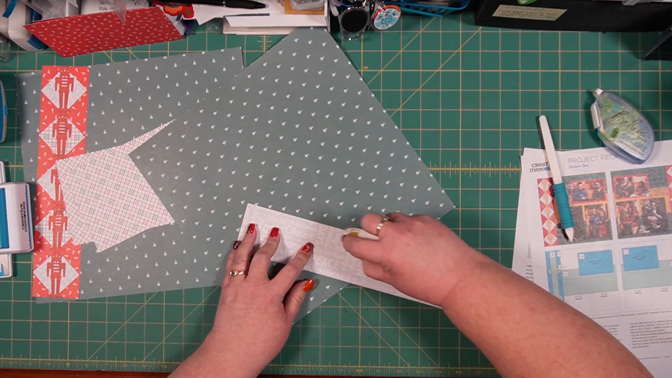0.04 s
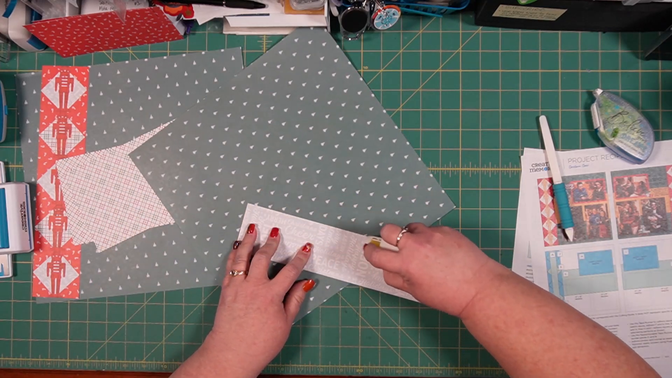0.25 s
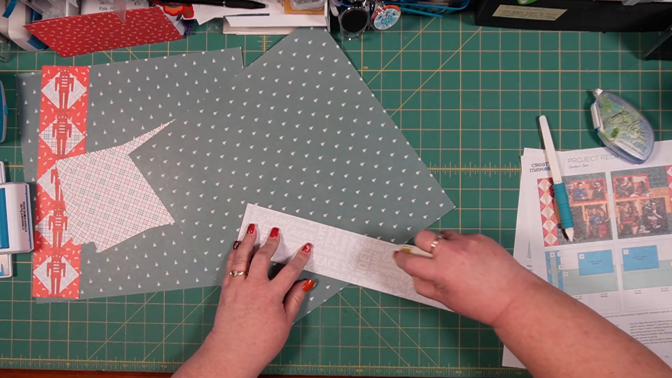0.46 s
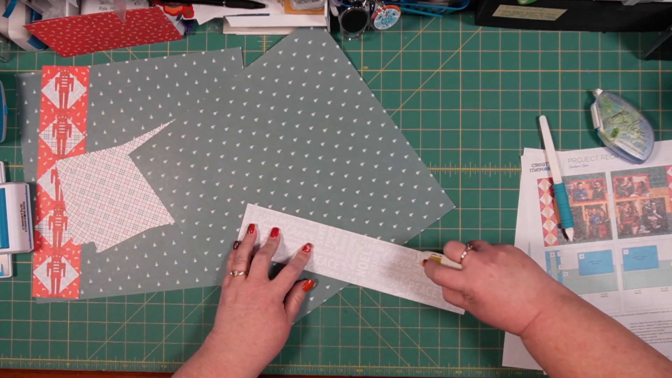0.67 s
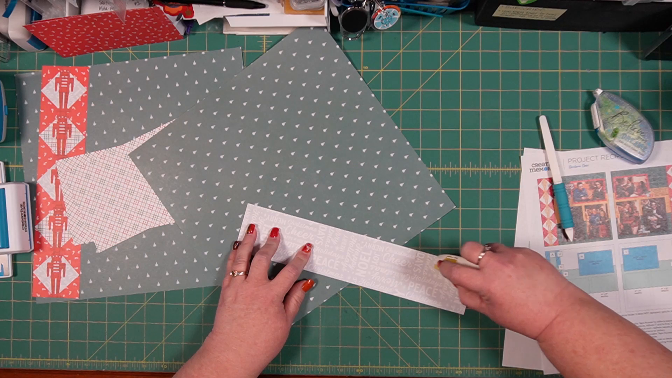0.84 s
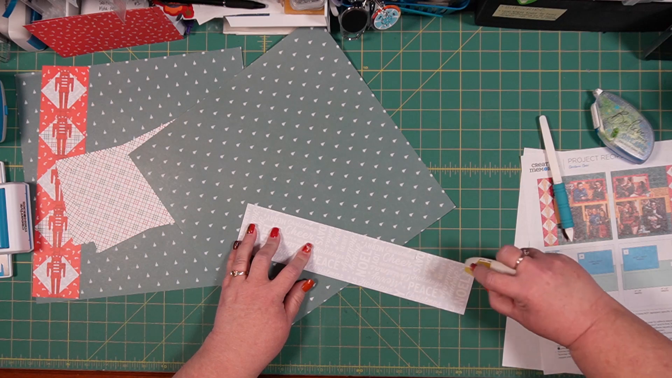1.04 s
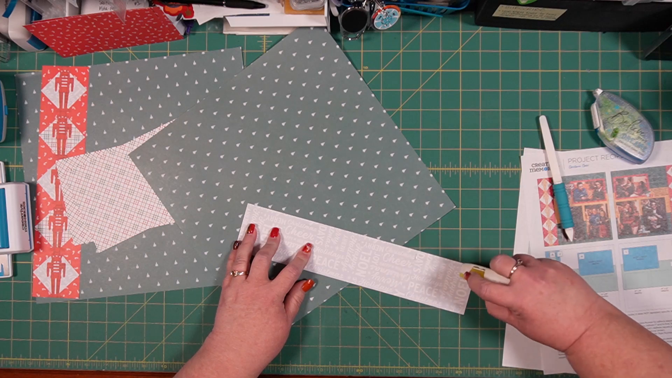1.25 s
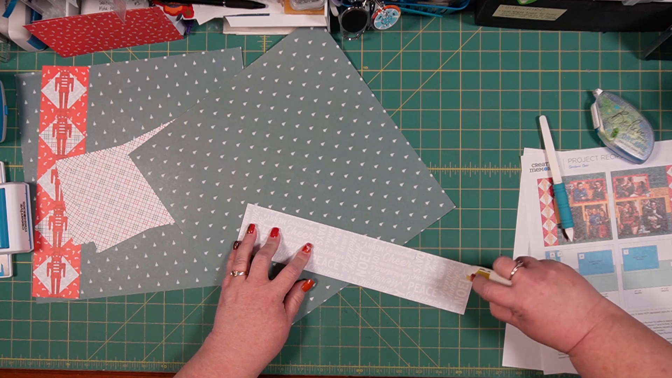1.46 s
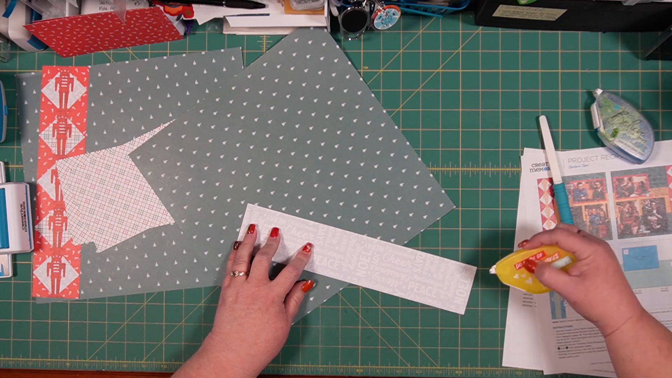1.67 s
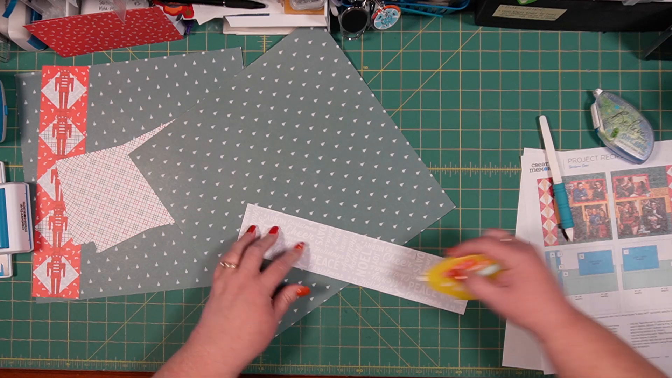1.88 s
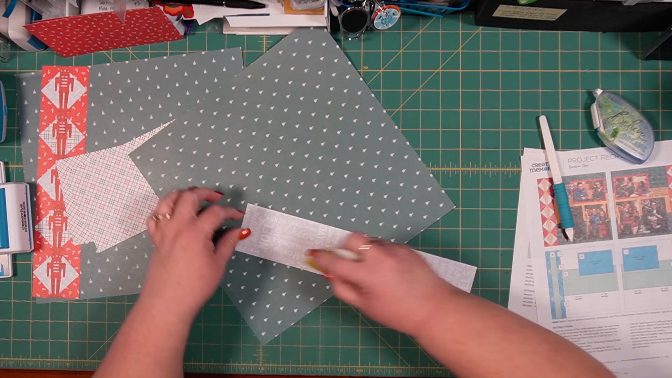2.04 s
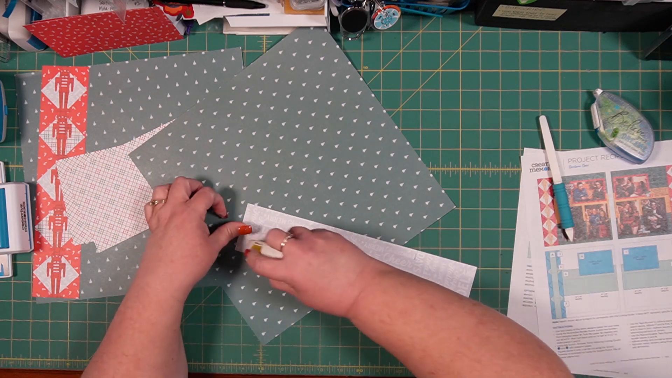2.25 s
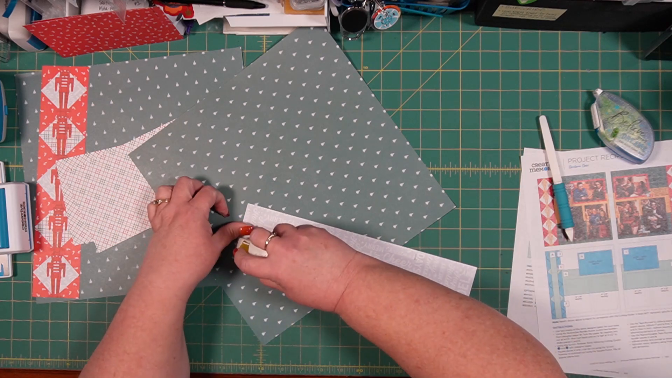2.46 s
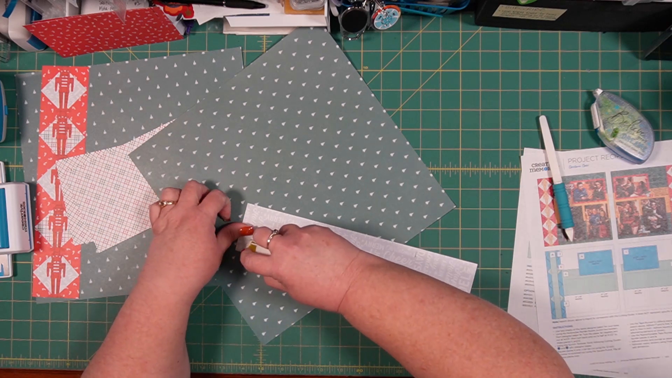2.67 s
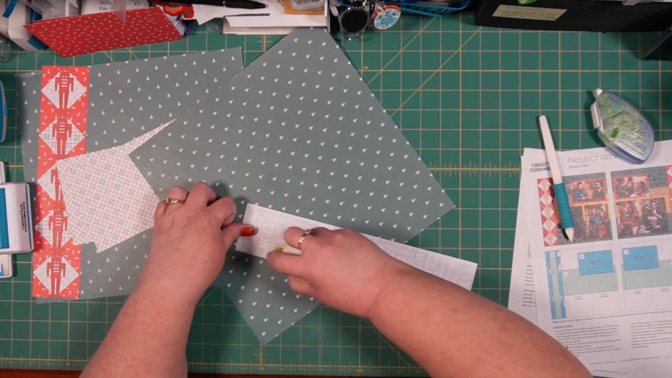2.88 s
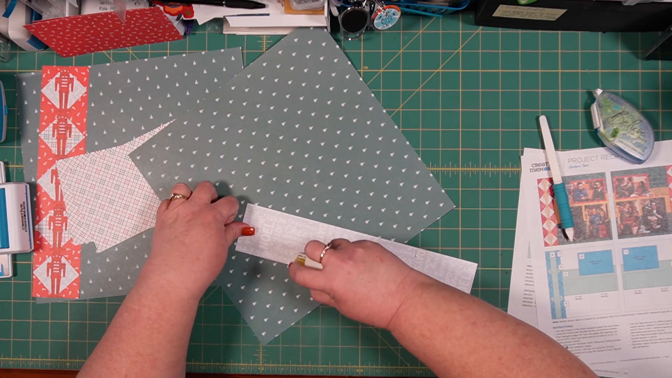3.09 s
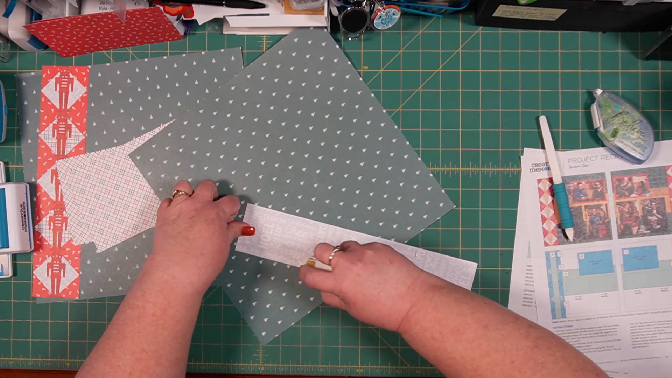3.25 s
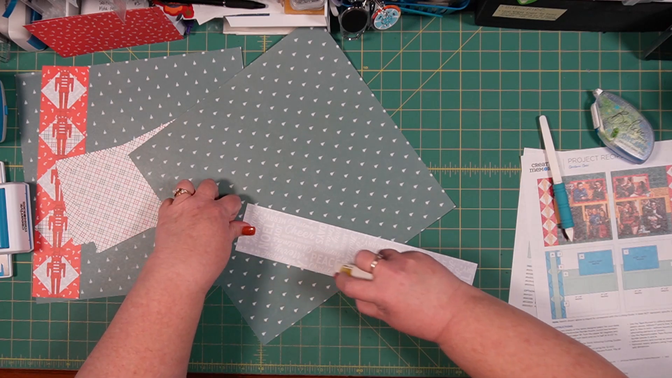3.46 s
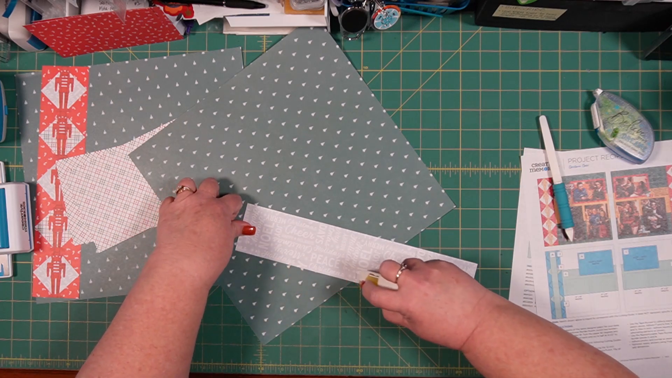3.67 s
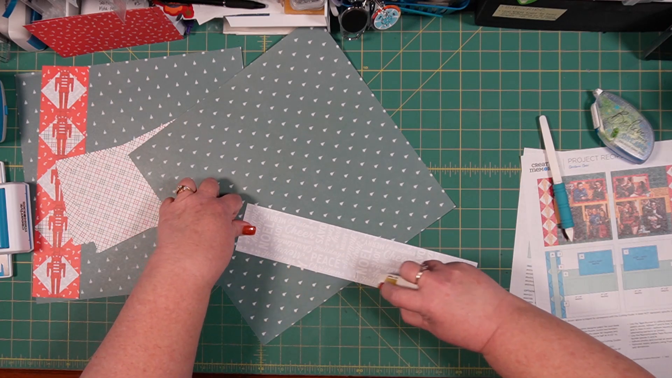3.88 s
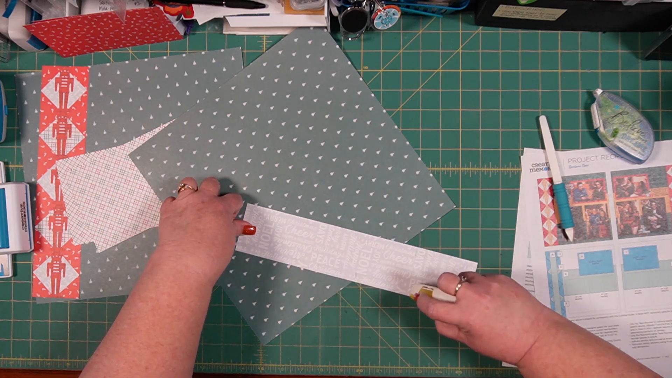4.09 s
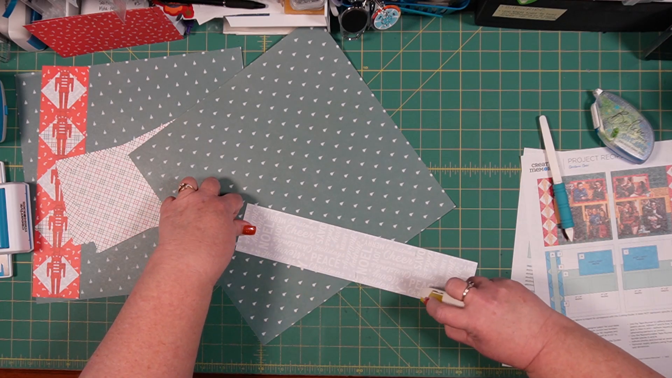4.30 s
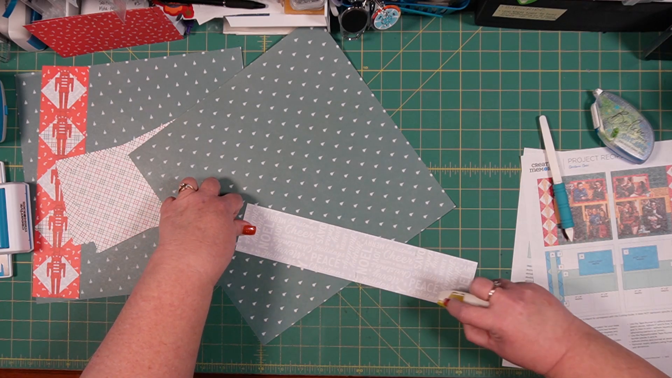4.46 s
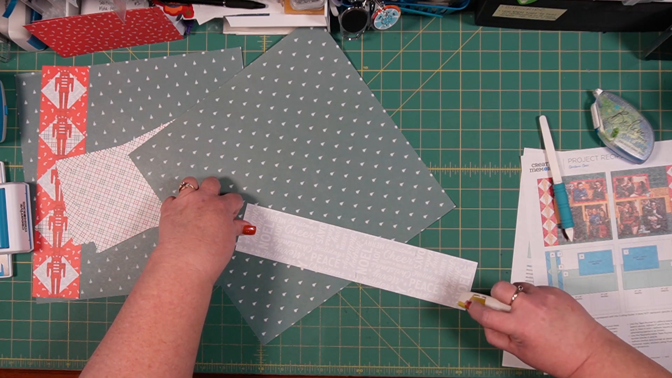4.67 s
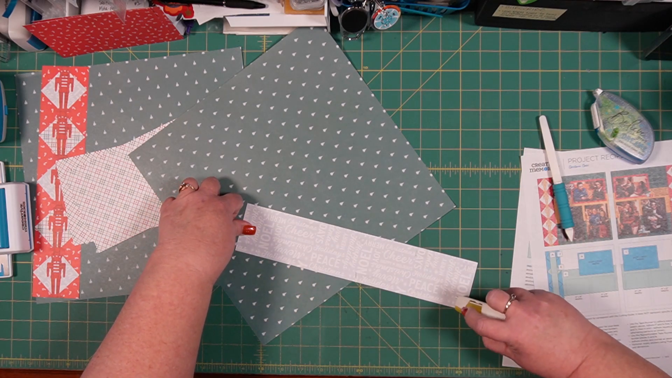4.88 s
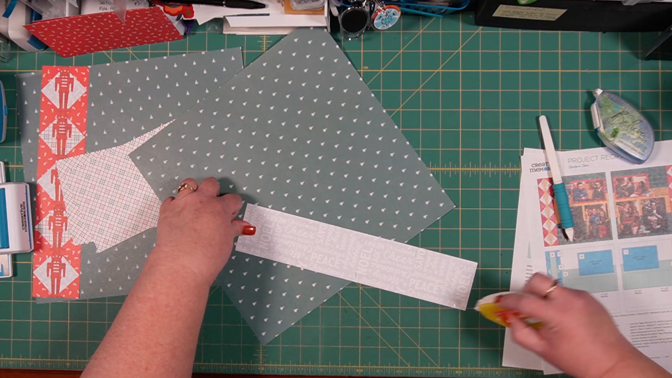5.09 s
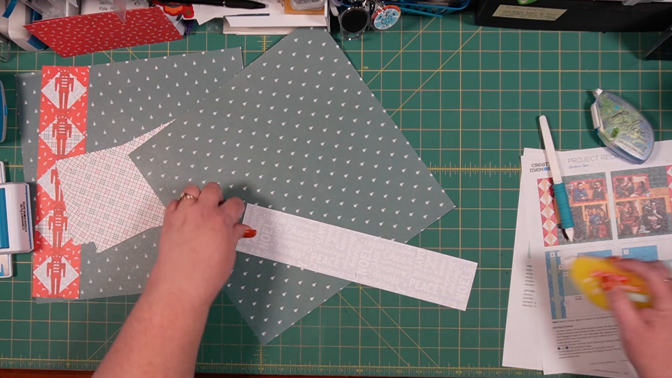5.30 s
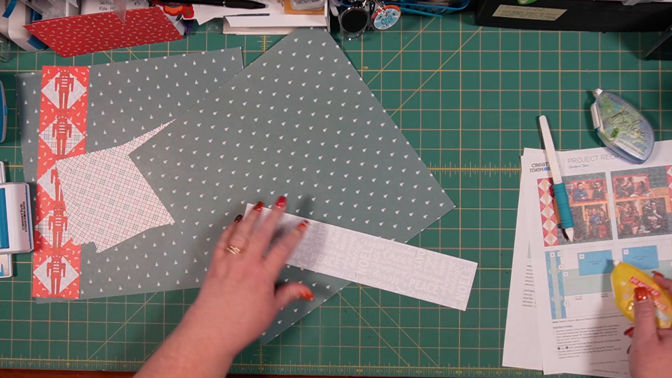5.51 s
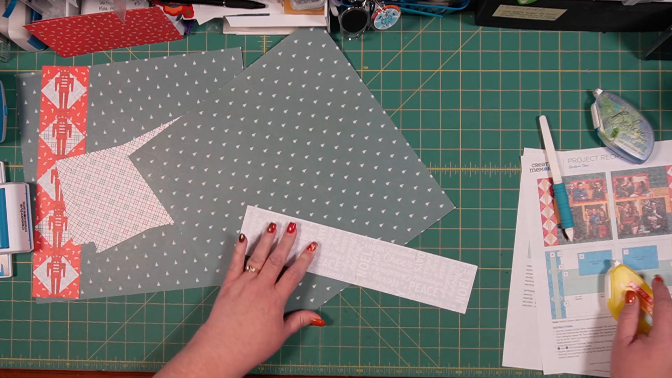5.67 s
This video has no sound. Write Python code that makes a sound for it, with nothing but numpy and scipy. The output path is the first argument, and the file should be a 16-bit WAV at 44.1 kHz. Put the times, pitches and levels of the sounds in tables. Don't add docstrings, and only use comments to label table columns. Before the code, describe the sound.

Eight dry, ratcheting zips of glue film, each under a quarter second, ring a small plastic case over faint table rumble. Between them come fingertip and plastic ticks on paper and faint skin and cloth rubbing. Finally the case knocks down loudly, rocks, and knocks again. Mono, near and mostly dry, short room echo, low hum and faint sinking whine underneath.

```python
import sys
import numpy as np
from scipy import signal
from scipy.fft import rfft, irfft, next_fast_len
from scipy.io import wavfile
from scipy.ndimage import map_coordinates

SR = 44100
rng = np.random.default_rng(int(sys.argv[2]) if len(sys.argv) > 2 else 0)


def int16_out(signal):
    q = np.round(np.clip(np.atleast_2d(signal).T, -1, 1) * 32767)
    wavfile.write(sys.argv[1], SR, q.astype(np.int16))


def ratio(d):
    e = np.asarray(d, float) / 20
    return 10 ** e


N = 253134

# centre_hz, width_hz, level_db
HOLLOW_MODES = [(670, 101, -6), (894, 41, 0.5), (1094, 85, 3), (1343, 210, -1)]
WALL_MODES = [(1858, 130, -1), (2314, 207, 5.5), (2664, 296, 0)]
NOSE_MODES = [(3222, 410, -2.5), (3752, 163, 4.5), (4380, 830, -10.5)]
# start_s, end_s, rumble_db
STROKES = [(0.195, 0.375, -42.5), (0.654, .852, -43), (1.424, 1.558, -45.5), (2.584, 2.833, -44),
           (3.115, 3.35, -46.5), (3.685, 3.87, -43), (4.259, 4.398, -45.5), (4.93, 5.044, -44)]


def unit(x):
    return x / np.sqrt(np.mean(x ** 2) + 1e-20)


def along(points, hz):
    point_hz, value = np.transpose(points)
    return np.interp(np.log(hz + 1), np.log(point_hz + 1), value)


def wobble(knots_per_s):
    knots = rng.standard_normal(int(N * knots_per_s / SR) + 4)
    return map_coordinates(knots, [np.arange(N) * knots_per_s / SR])


def filtered(x, response):
    m = next_fast_len(N + SR // 2)
    return irfft(rfft(x, m) * response(np.fft.rfftfreq(m, 1 / SR)), m)[:N]


def rung(x, modes):
    def shape(f):
        total = 0
        for k, (centre_hz, width_hz, db) in enumerate(modes):
            loss = 1j * f * width_hz
            total = total + (-1) ** k * ratio(db) * loss / (centre_hz * centre_hz - f * f + loss)
        return total

    power = np.mean(abs(shape(np.linspace(1, SR / 2, num=4096))) ** 2)
    return filtered(x, lambda f: shape(f) / np.sqrt(power))


def snaps(s, db):
    return np.bincount(np.round(s * SR).astype(int), ratio(db), N + 1)[:N]


def bursts(s, ms, db, rise_ms, fall_ms, grain_db):
    t_ms = np.arange(SR // 20) * 1000 / SR
    rise = np.clip(t_ms / np.c_[rise_ms + 0 * s], 0, 1)
    fall = np.exp(-np.clip(t_ms - np.c_[ms], 0, None) / fall_ms)
    where = np.round(np.c_[s] * SR).astype(int) + np.arange(len(t_ms))
    burst_power = (ratio(np.c_[db]) * rise * fall) ** 2
    power = np.bincount(where.ravel(), burst_power.ravel(), N + SR)[:N]
    grains = ratio(grain_db * wobble(2500)) * rng.standard_normal(N)
    return np.sqrt(power) * unit(grains)


def during(gains_db, edge_s=0.024):
    t = np.arange(N) / SR
    total = 0
    for (start_s, end_s, _), db in zip(STROKES, gains_db):
        inside = np.clip(np.minimum(t - start_s, end_s - t) / edge_s + 1, 0, 1)
        total = total + ratio(db) * inside
    return total


def peeling():
    # hollow_db, wall_db, nose_db, film_db, spool_db
    grip = [
        (0, 0, 1, -2.5, 0),
        (2.5, 4, 2, -0.5, -1),
        (.5, 1.5, 2.5, 3, -2),
        (-1, 0, -3.5, 1.5, 1),
        (0, 1.5, 1.5, -3.5, 1.5),
        (-.5, 3, 0, 0, -2.5),
        (0.5, 3, 2.5, 0, -7),
        (1, 2.5, 0, 2, 2.5),
    ]
    # centre_hz, width_hz, level_db
    film_modes = [(4810, 510, -0.5), (5690, 510, 3), (7340, 960, -5)]
    fizz_modes = [(9160, 2140, -3), (11900, 2350, -2), (15140, 2850, 0.5)]
    spool_hz = [9900, 10830, 10000, 10100, 9920, 9700, 9900, 10020]

    s, ms, crackle_db, case_db = jerks()
    hollow_db, wall_db, nose_db, film_db, spool_db = np.transpose(grip)
    hold_ms = np.clip(ms - 1.2, 0.3, None)

    crackle = bursts(s, hold_ms, crackle_db, rise_ms=0.5 * ms, fall_ms=0.89, grain_db=0.9)
    fizz = ratio(-0.5) * rung(crackle, fizz_modes)
    film = ratio(-3.5) * rung(during(film_db) * crackle, film_modes)
    spool = 0
    for k, hz in enumerate(spool_hz):
        only_this_db = spool_db - 120 * (np.arange(len(grip)) != k)
        spool = spool + rung(during(only_this_db) * crackle, [(hz, 410, 0)])
    spool = ratio(-9) * spool

    release = snaps(s + 0.0007, case_db + 19)
    catch = snaps(s + (0.5 + hold_ms) / 1000, case_db + 15)
    snap = release - catch
    shake = bursts(s, hold_ms, case_db - 3, rise_ms=0.4, fall_ms=1.4, grain_db=1.2) + snap
    slow = bursts(s, hold_ms, case_db, rise_ms=0.69, fall_ms=3.07, grain_db=2)
    hollow = ratio(-6.5) * rung(during(hollow_db) * (slow + 0.5 * snap), HOLLOW_MODES)
    wall = ratio(-4.0) * rung(during(wall_db) * shake, WALL_MODES)
    nose = ratio(-6) * rung(during(nose_db) * (shake + 0.62 * slow), NOSE_MODES)
    return fizz + film + spool + hollow + wall + nose


def jerks():
    # time_s, glue_steps
    travel = [
        [(.2003, 1), (.2055, 2), (.227, 4), (.2791, 11), (.304, 14), (.3506, 20), (.3689, 22), (.3813, 24)],
        [(.6508, 0), (.6831, 1), (.7173, 6), (.7292, 7), (.7563, 10), (.7987, 14), (.8121, 15), (.8273, 16),
         (.8403, 17)],
        [(1.4243, 0), (1.4489, 2), (1.4895, 6), (1.5141, 8), (1.5501, 9)],
        [(2.6133, 0), (2.652, 2), (2.6814, 4), (2.7045, 6), (2.7668, 12), (2.7884, 14), (2.8049, 15),
         (2.8159, 16)],
        [(3.1104, 0), (3.146, 1), (3.176, 2), (3.1912, 3), (3.2047, 4), (3.2284, 6), (3.2702, 10), (3.3129, 14),
         (3.3211, 15)],
        [(3.68, 0), (3.707, 3), (3.7115, 4), (3.7215, 5), (3.7359, 7), (3.7456, 8), (3.809, 17), (3.8394, 20),
         (3.8568, 21)],
        [(4.2492, 0), (4.2815, 2), (4.3025, 4), (4.339, 8), (4.358, 10), (4.3718, 11), (4.3801, 12)],
        [(4.9322, 0), (4.9586, 2), (5.0225, 8), (5.0334, 9)],
    ]
    # crackle_first_db, crackle_last_db, case_first_db, case_last_db, catch_db
    force = [
        (-23, -21.5, -24, -21.5, -15),
        (-19.5, -20, -27, -23.5, -17),
        (-22, -21, -22, -23, -20),
        (-20.5, -23, -17.5, -20.5, -19),
        (-21.5, -23.5, -22, -21, -6),
        (-20.5, -21.5, -21.5, -22, -13),
        (-21, -22, -22, -24, -16),
        (-22, -24.5, -22, -23, -21),
    ]
    # start_s, length_ms, crackle_db, case_db
    strays = [(.1809, 2, -22, -24), (.6753, 2.6, -35, -31.5), (1.5277, 8.1, -34, -30),
              (2.7982, 3, -37, -18), (2.826, 3.1, -38, -38), (3.1814, 1.9, -20, -25),
              (3.3257, 5.8, -31, -29), (4.255, 1.8, -20.5, -28), (4.3923, 1.9, -29, -28),
              (5.0427, 3.2, -39, -21)]
    limp_ms = 0.8
    reference_ms, first_ms, last_ms = 3.45, 2.9, 4.4

    rows = [strays]
    for points, (crackle_0, crackle_1, case_0, case_1, catch_db) in zip(travel, force):
        at_s, steps = np.transpose(points)
        k = np.arange(steps[0], steps[-1] + 1)
        s = np.interp(k, steps, at_s) - k % 2 * limp_ms / 1000
        gone = (k - k[0]) / (k[-1] - k[0])
        luck = rng.standard_normal((len(k), 4))
        ms = (first_ms + (last_ms - first_ms) * np.sqrt(gone)) * np.exp(0.2 * luck[:, 0])
        softer_db = 4 * np.log2(ms / reference_ms)
        crackle_db = crackle_0 + (crackle_1 - crackle_0) * gone - softer_db + 1.1 * luck[:, 1]
        case_db = case_0 + (case_1 - case_0) * gone + 0.9 * luck[:, 2]
        rows.append(np.c_[s, ms, crackle_db, case_db])

        late_s = s[:-1] + np.minimum(np.diff(s) / 2, 13 / 1000)
        weaker_db = catch_db + 2 * luck[:-1, 3]
        rows.append(np.c_[late_s, ms[:-1], crackle_db[:-1] + weaker_db, case_db[:-1] + weaker_db])
    return np.concatenate(rows).T


def taps():
    # start_s, wall_db, nose_db, tick_db, hollow_db
    tap_rows = [(0.4919, -40.5, -45, -57, -45), (0.6165, -50, -50, -43, -54), (1.4074, -56, -42, -51, -43),
                (1.7384, -41, -43, -63, -45), (1.9061, -36.5, -45, -53, -41.5),
                (2.0345, -35.5, -43, -54, -44), (2.3297, -51, -41, -45, -44.5),
                (2.3693, -49, -52, -42.5, -49), (2.5009, -32, -34, -32.5, -34),
                (2.6024, -49, -56, -49, -37), (3.054, -40, -41.5, -62, -44.5),
                (3.4082, -36, -42.5, -67, -42.5), (3.4296, -47, -53, -69, -43),
                (3.6416, -39, -37, -44, -41.5), (3.9399, -42, -49, -65, -52), (4.1582, -42, -46, -48, -41),
                (4.7713, -49, -49, -46, -65), (4.8464, -31, -27, -47, -32.5),
                (5.1911, -38, -33.5, -51, -44), (5.4056, -52, -45, -28, -56), (5.5613, -30, -35, -46, -29),
                (5.6655, -48, -44, -31, -46)]
    # start_s, wall_db, nose_db, tick_db, hollow_db
    lift_rows = [(0.1894, -22.5, -36, -52, -24), (.8495, -32, -33, -40, -30.5), (1.554, -31, -24, -36, -31),
                 (.869, -35, -41, -37.5, -36), (2.8282, -41, -35, -38, -27.5),
                 (3.8571, -31, -35, -40, -28.5), (3.8674, -35, -40, -48, -32), (4.3948, -26, -18, -30, -26),
                 (4.404, -37, -29, -48, -31.5), (5.0436, -26, -25, -35, -27)]
    # start_s, wall_db, nose_db, tick_db, hollow_db
    press_rows = [(0.1544, -39, -38.5, -48, -37), (0.626, -42, -43, -43, -44),
                  (1.3354, -27.5, -35.5, -40.5, -32), (3.6374, -44, -44, -52, -45),
                  (4.8379, -34, -38, -48, -37), (4.9028, -38, -44, -54, -43), (4.9144, -37, -43, -55, -42)]
    # start_s, peak_db
    thud_rows = [(0.155, -39), (0.621, -36), (1.336, -30), (2.499, -29.5), (3.043, -34), (3.642, -45),
                 (4.846, -29.5), (5.572, -30.5), (5.71, -25.5), (5.734, -26)]

    push = snaps(*np.transpose(thud_rows)) * ratio(20)
    thud = rung(push, [(81, 63, 3.0), (149, 54, 10.0), (340, 140, -6.5)])
    sharp = contacts(tap_rows + lift_rows, ms=0.73, snap_db=12.5, gain_db=-0.13)
    soft = contacts(press_rows, ms=3.9, snap_db=-20, gain_db=-0.5)
    return sharp + soft + thud


def contacts(rows, ms, snap_db, gain_db):
    # centre_hz, width_hz, level_db
    paper_modes = [(900, 120, -7), (1120, 55, 0), (1370, 160, -5)]
    s, wall_db, nose_db, tick_db, hollow_db = np.transpose(rows)

    def touch(db, fall_ms):
        rub = bursts(s, ms + 0 * s, db, rise_ms=0.46 * ms, fall_ms=fall_ms, grain_db=2.5)
        return rub + snaps(s + 0.0004, db + snap_db)

    tick = rung(touch(tick_db + 1.0, 1.1), [(4940, 1500, 1.5), (8600, 3000, -3.0), (13500, 3900, -7.5)])
    wall = rung(touch(wall_db + 2.0, 1.44), WALL_MODES)
    nose = rung(touch(nose_db + 2.5, 2.5), NOSE_MODES)
    hollow = rung(touch(hollow_db + 3, 6.0), paper_modes)
    return ratio(gain_db) * (tick + wall + nose + hollow)


def landing():
    # start_s, peak_db, crack_db
    bounces = [(5.57, -6, -12.5), (5.581, -22, -33), (5.589, -28, -43), (5.616, -27, -44),
               (5.627, -26, -41), (5.678, -27, -32), (5.702, -24, -36), (5.7091, -2.5, -9.5),
               (5.722, -15, -31), (5.736, -12, -24)]
    # centre_hz, width_hz, level_db
    table_modes = [(380, 90, -17), (680, 90, -13), (900, 70, -7), (1110, 42, 0), (1330, 110, -9),
                   (1590, 110, -12)]
    s, peak_db, crack_db = np.transpose(bounces)
    blow = bursts(s, 0 * s + 1.0, peak_db - 13, rise_ms=0.3, fall_ms=2.5, grain_db=0.0)
    blow = blow + snaps(s, peak_db + 13)
    crack = bursts(s, 0 * s + 0.96, crack_db - 3.5, rise_ms=0.2, fall_ms=1.0, grain_db=-1.0)
    crack = crack + snaps(s, crack_db + 3)
    crack_modes = [(2300, 490, -1), (3500, 770, 2.0), (5400, 2000, -11.0), (9000, 1500, -14)]
    return rung(blow, table_modes) + rung(crack, crack_modes)


def slide():
    # time_s, level_db
    scrape_points = [(5.56, -68), (5.575, -39), (5.62, -55), (5.655, -56), (5.672, -53), (5.74, -35)]
    s, db = np.transpose(scrape_points)
    scrape = ratio(5.4 * wobble(400)) * rng.standard_normal(N)
    level_db = np.interp(np.arange(N) / SR, s, db, left=-120)
    return ratio(level_db) * unit(rung(scrape, HOLLOW_MODES[1:] + WALL_MODES + NOSE_MODES))


def rumble():
    low = rung(rng.standard_normal(N), [(71.5, 17, -0.5), (145.6, 42, 0), (398, 116, -6.5)])
    return during(np.transpose(STROKES)[-1]) * ratio(2.0 * wobble(25.27)) * unit(low)


def rustle():
    # time_s, level_db
    rub_points = [(0, -58.5), (1.6, -61), (1.79, -55), (1.9, -55.5), (2.1, -53.5), (2.3, -55), (2.48, -58),
                  (2.505, -48), (2.535, -58), (2.57, -59), (2.605, -47.5), (2.63, -56.5), (5.45, -59),
                  (5.66, -50.5), (5.67, -43), (5.7, -44), (5.716, -62)]
    # freq_hz, density_db_per_hz
    cloth_spectrum = [(600, -30), (1500, 0), (3500, 0), (7000, -10.5), (12000, -12), (16000, -12.5)]
    s, db = np.transpose(rub_points)
    grains = ratio(1.07 * wobble(300)) * rng.standard_normal(N)
    noise = filtered(grains, lambda f: ratio(along(cloth_spectrum, f)))
    flutter_db = 1.8 * wobble(35)
    return ratio(np.interp(np.arange(N) / SR, s, db) + 2.0 + flutter_db) * unit(noise)


def room(x):
    # freq_hz, t60_s
    decay = [(300, 0.29), (1500, 0.13), (5000, 0.14), (14000, 0.036)]
    out, block = np.zeros(N + SR), SR // 10
    for start in range(0, N, block):
        hz, t, z = signal.stft(rng.standard_normal(SR // 4), SR, nperseg=128)
        fade = ratio(-60 * t / along(decay, hz)[:, None])
        tail = signal.istft(z * fade, SR, nperseg=128)[1]
        answer = signal.fftconvolve(x[start:start + block], tail / np.linalg.norm(tail))
        out[start + 60:][:len(answer)] += answer
    return out[:N]


def air():
    # freq_hz, density_db_per_hz
    background_spectrum = [(12, -73), (20, -62), (45, -9.5), (86, -14), (102, -5.5), (160, -2.5), (372, -16),
                           (465, -12), (551, -13.5), (709, -12.5), (1110, -12.5), (1840, -15.5), (2010, -27.5),
                    (15200, -47), (16500, -63)]
    # first_hz, last_hz, level_db
    whines = [(481.4, 458.3, -51), (424.5, 401, -58)]
    drift_db = 0.6 * wobble(5)
    noise = filtered(rng.standard_normal(N), lambda f: ratio(along(background_spectrum, f)))
    tone = ratio(-47.5 + drift_db) * unit(noise)
    for first_hz, last_hz, db in whines:
        phase = 2 * np.pi * np.cumsum(np.linspace(first_hz, last_hz, N)) / SR
        tone = tone + ratio(db + 2.5 + 1.1 * wobble(3.13)) * np.sin(phase)
    return tone


def scene():
    near = peeling() + taps() + landing() + slide()
    mix = near + ratio(-10.5) * room(near) + rumble() + rustle() + air()
    return mix[None]


def roll_off(x):
    return signal.sosfilt(signal.butter(12, 17000, fs=SR, output="sos"), x)


def record(dry):
    # freq_hz, gain_db
    rolloff = [(15500, 0.5), (16000, -27), (16800, -39), (17100, -70)]
    rounded = dry[0] / (1 + abs(dry[0] / 0.46) ** 6) ** (1 / 6)
    mix = filtered(rounded, lambda f: ratio(along(rolloff, f)))[None]
    return roll_off(mix)


dry = scene()
out = record(dry)
int16_out(out)
```